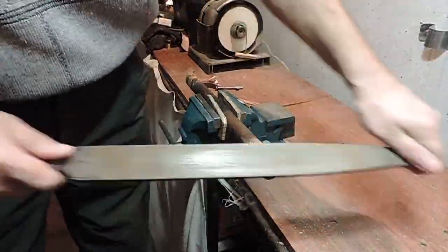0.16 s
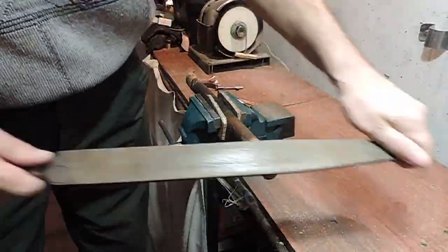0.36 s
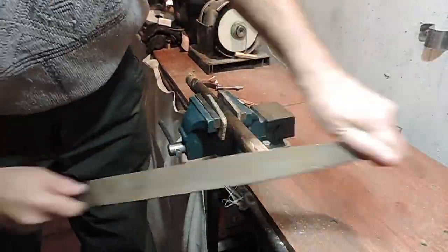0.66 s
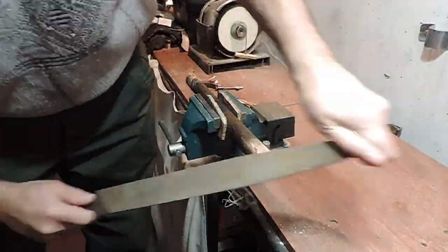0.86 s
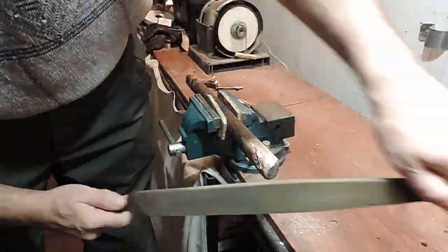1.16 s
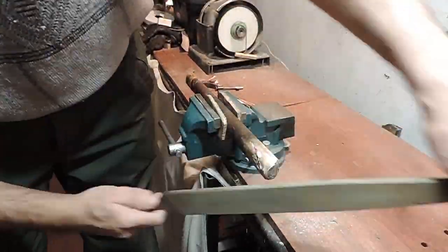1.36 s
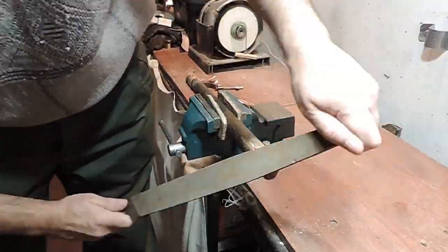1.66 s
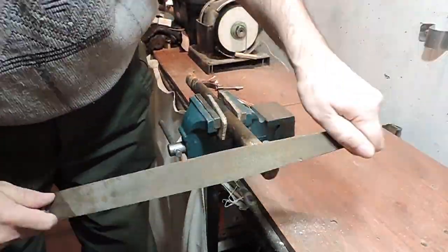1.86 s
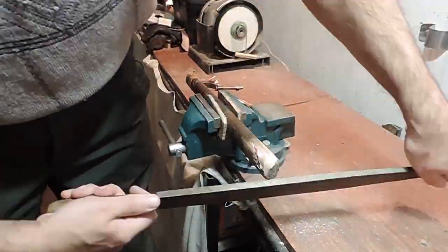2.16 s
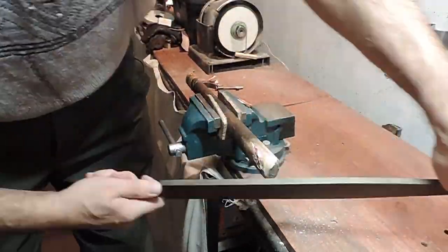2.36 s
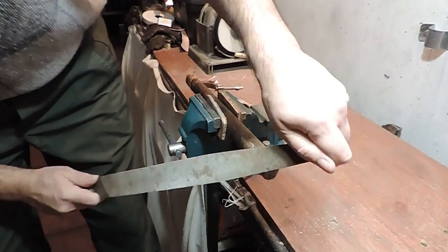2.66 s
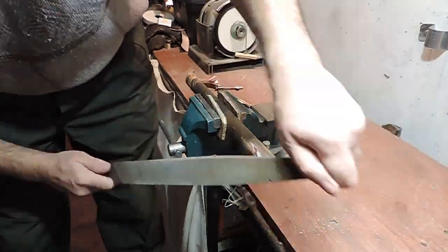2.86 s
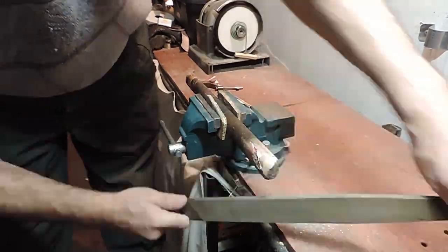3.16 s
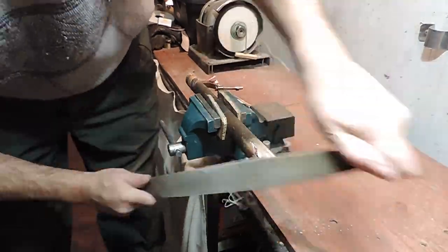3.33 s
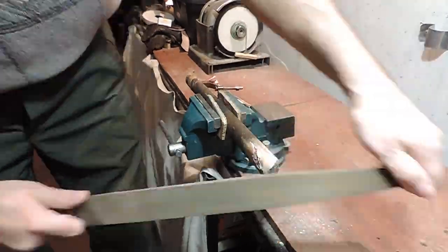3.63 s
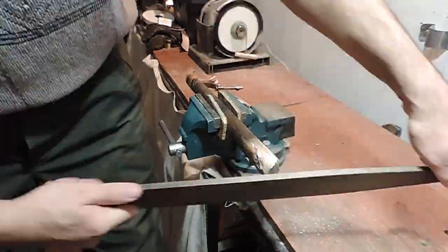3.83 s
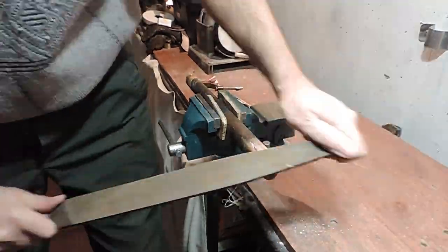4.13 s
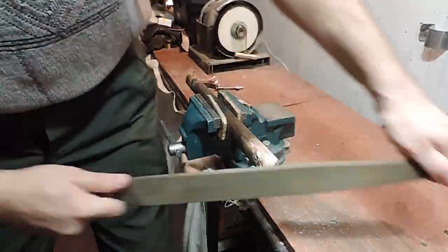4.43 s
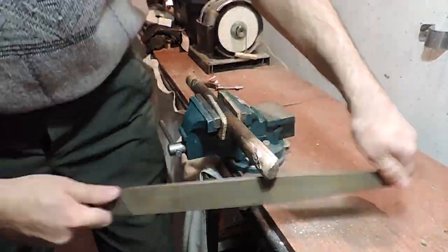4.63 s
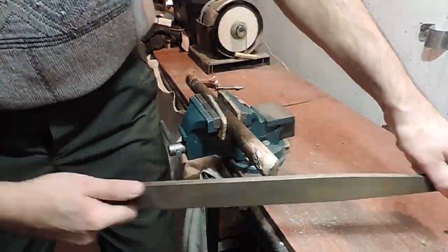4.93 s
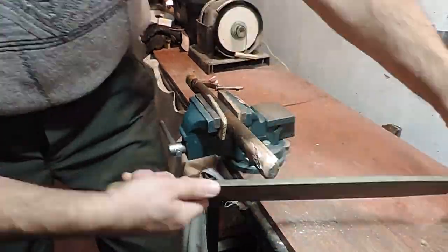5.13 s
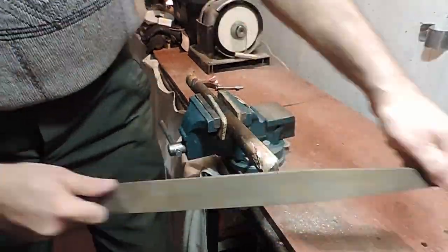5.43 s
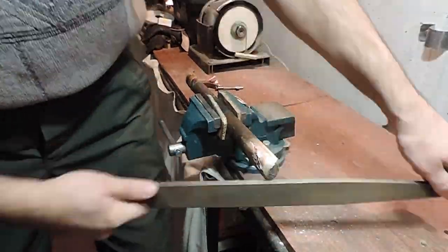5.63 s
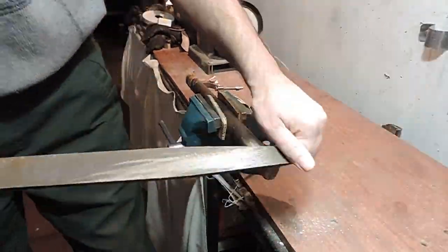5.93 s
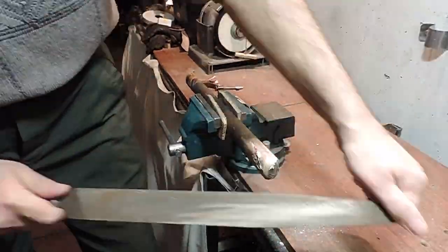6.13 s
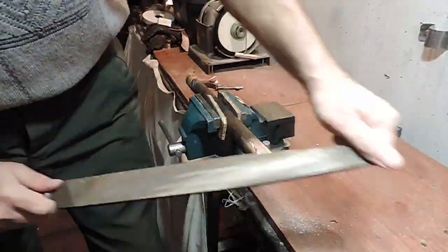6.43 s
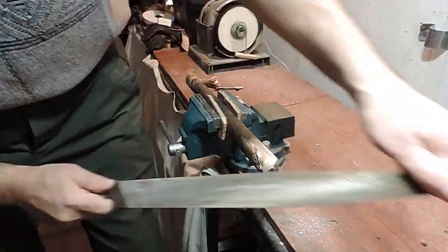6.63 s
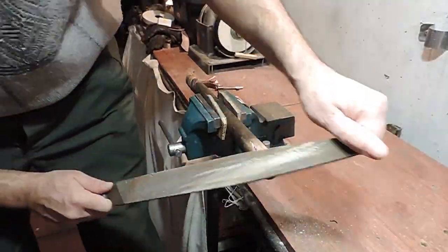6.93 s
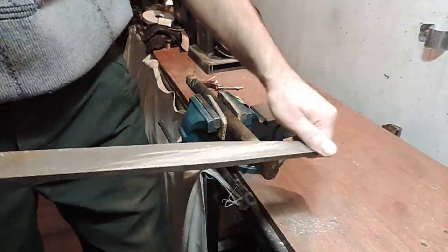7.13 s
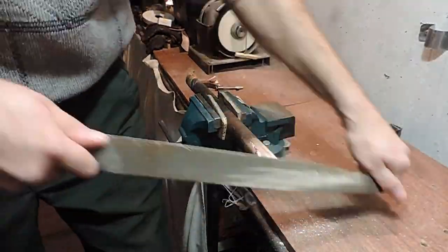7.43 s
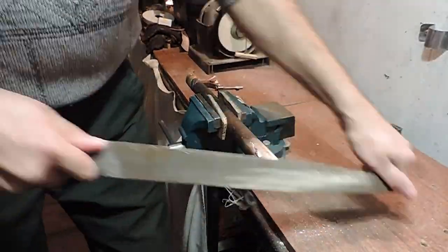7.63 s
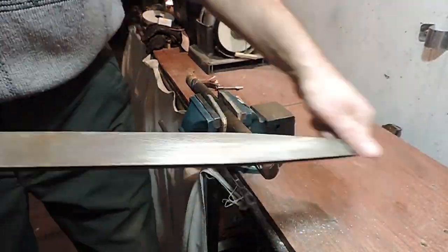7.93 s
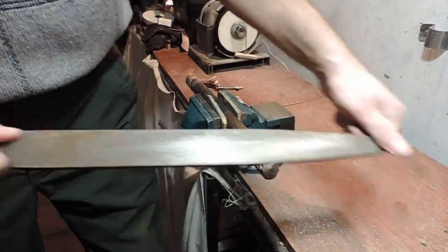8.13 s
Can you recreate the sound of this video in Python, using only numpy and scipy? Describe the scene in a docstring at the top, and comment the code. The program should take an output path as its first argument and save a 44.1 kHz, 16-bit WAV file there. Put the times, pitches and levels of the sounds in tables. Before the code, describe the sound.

A big steel file works a wooden handle clamped in a vise, nearly five strokes a second. Each stroke starts with a brief chatter and rises into a rasping whine. After a few seconds the file sometimes knocks the wood, drawing a low boom from the bench, and twice the steel rings briefly. The sound is close, with short wall echoes and a faint workshop hum.

```python
"""Over the faint hum of a small workshop, a big steel file sweeps a wooden handle held in a vise,
nearly five strokes a second. In each stroke the teeth land and chatter, speed up into a rasping
whine, then brake and lift off; the walls answer briefly. From about three seconds in, the file now
and then bumps the wood and the bench booms. Twice the steel slips off the wood and rings."""
import sys
import numpy as np
from scipy import signal
from scipy.fft import rfft, irfft, next_fast_len
from scipy.io import wavfile
from scipy.ndimage import map_coordinates

SR = 44100
rng = np.random.default_rng(int(sys.argv[2]) if len(sys.argv) > 2 else 0)


def wav_out(sig):
    """Save sig, one row per channel (or a flat mono array), as 16-bit PCM at SR to the path in sys.argv[1]."""
    wavfile.write(sys.argv[1], SR, np.round(np.clip(np.atleast_2d(sig).T, -1, 1) * 32767).astype(np.int16))


N = 365148
T = np.arange(N) / SR

# Colour of the room tone: (frequency [Hz], relative level [dB])
ROOM_COLOUR = [(20, 1), (75, -5), (110, -10), (155, -10), (220, -19), (500, -11.5), (750, -23), (1150, -11),
               (1700, -19), (3000, -19), (7000, -25), (16000, -36)]
# File strokes; pressure 0 is an ordinary hand: (landing time [s], run-up [s], braking [s],
# top tooth rate [Hz], landing level [dB], whine level [dB], run-up pressure [dB], braking pressure [dB])
STROKES = [(.003, 0.053, 0.032, 2715, -35, -35.5, 6.5, 0), (.203, 0.05, 0.031, 2664, -32, -28.5, 5.5, 2),
           (.404, 0.058, 0.025, 3043, -28, -31.5, 5.5, 8), (.597, 0.057, 0.023, 2644, -32, -26, 3, 3.5),
           (.792, 0.078, 0.019, 3584, -36.5, -24.5, 1.5, 2),
           (1.008, 0.058, 0.023, 3467, -28.5, -29, 1.5, 8.5),
           (1.208, 0.052, 0.021, 3098, -30, -29, -2, 2.5),
           (1.415, 0.052, 0.026, 3282, -26.5, -30.5, -0.5, 3.5),
           (1.624, 0.056, 0.024, 2815, -28.5, -30.5, 0.5, 1.5),
           (1.845, 0.053, .017, 2740, -28, -30.5, -15, 7),
           (2.057, 0.055, 0.022, 2434, -28.5, -23.5, 3, 5.5),
           (2.267, .039, 0.04, 2582, -27, -27, -0.5, 6.5), (2.46, 0.055, 0.023, 2452, -33.5, -25, 4, -5.5),
           (2.665, 0.059, 0.026, 2796, -37, -27, -2, -2), (2.875, 0.055, 0.022, 3026, -29, -30, -4, 2.5),
           (3.081, 0.051, .02, 2971, -26.5, -28.5, -6, 4.5),
           (3.26, 0.08, 0.02, 2274, -31.5, -37.5, -1.5, -7), (3.489, .049, 0.017, 3483, -30, -28.5, -1, 4),
           (3.686, 0.058, 0.018, 2673, -31, -21.5, -7, 0.5), (3.894, 0.072, .02, 2706, -32.5, -24, 7, 5.5),
           (4.096, 0.063, 0.022, 3123, -40, -24, -3, -6.5), (4.286, 0.065, .032, 2688, -39, -28.5, -2, -2),
           (4.493, 0.057, .028, 3000, -34.5, -26.5, 2.5, -4.5),
           (4.69, 0.06, .023, 2659, -29, -26.5, -1.5, -3), (4.988, 0.084, 0.021, 2942, -38, -24, 6.5, -17),
           (5.213, 0.077, .033, 3254, -34, -31, 2.5, 3.5), (5.462, 0.072, 0.025, 2745, -26, -27, -0.5, -5),
           (5.684, .082, 0.031, 2420, -37, -27.5, 6, -7), (6.113, 0.1, 0.016, 2583, -30, -24, 5.5, -9),
           (6.428, 0.079, 0.017, 2727, -25, -24.5, 2.5, -8),
           (6.667, 0.068, 0.018, 2552, -30.5, -20, 4.5, -2),
           (6.869, 0.075, 0.013, 2704, -38.5, -23, 1, -13),
           (7.109, 0.043, .015, 2818, -28.5, -27, -7.5, -4.5),
           (7.332, 0.07, 0.024, 2582, -31, -26.5, 6.5, -6.5), (7.542, 0.061, .033, 2053, -35.5, -24, 6, -5),
           (7.749, 0.07, .028, 2047, -35.5, -28.5, 6, -10.5),
           (7.941, .069, 0.024, 2038, -32.5, -28.5, 3, 10), (8.159, 0.066, 0.027, 2052, -33, -28, 5, 12.5)]
# How the file meets the wood: (time [s], flatness [0 tilted to 1 flat])
FLATNESS = [(0, 1), (.22, 0.26), (1.6, 0.14), (2.3, 0), (2.7, .25), (6.7, 0.26), (7.35, 1), (8.2, 0.99)]
# Resonances of handle, vise and file: (frequency [Hz], width [Hz], boost at depth 1 [dB])
RESONANCES = [(155.5, 21, 9), (235, 31, 5.5), (304.6, 41, 6.5), (390.6, 32.3, 6.5), (445.8, 81, 10.5),
              (589, 64, 3.5), (691.4, 37, 4.5), (900, 26, 2), (947, 46, -16), (1263, 162, 8),
              (1482, 91, -4), (1600, 130, -0.5), (1882, 25, 3.5), (2045, 77, 4), (2625, 81, 7.5),
              (2728, 58, 4), (3030, 81, 0), (3195, 230, 4.5), (4045, 81, 6), (5104, 106, 5),
              (6110, 410, 4.5), (10760, 1200, 4)]
# Colours of knocked wood, rasp, whine and bump scratch: (frequency [Hz], relative level [dB])
WOOD_COLOUR = [(40, -38.5), (90, -22), (125, -8.5), (250, -8), (450, -1.5), (800, -2.5), (1300, -3.5),
               (2500, -11), (4000, -14.5), (8000, -34), (16000, -46)]
RASP_COLOUR = [(100, -40.5), (500, -25), (1200, 2.5), (2200, -4), (3200, 1), (4500, 2.5), (6200, -1.5),
               (7800, -9.5), (10500, -5), (12500, -15.5), (14500, -12), (16000, -28.5)]
WHINE_COLOUR = [(500, -13), (1300, 0.5), (2000, 1), (2700, -1), (3400, 4), (5000, 0.5), (16000, 2.5)]
SCRATCH_COLOUR = [(100, -33.5), (600, -14.5), (1300, -4.5), (2000, 0.5), (3500, -6.5), (6000, -10.5),
                  (9000, -16.5), (16000, -37)]
# Balance of the direct sound: (frequency [Hz], left minus right [dB])
BALANCE = [(100, -3.5), (1000, 0), (4000, 0), (9000, -4.5), (15000, -1)]
# Phase spread of the direct sound: (frequency [Hz], lead of the right channel [rad])
RIGHT_LEAD = [(1500, 0), (3500, .3), (5000, .8), (9000, 1), (14000, 1.8)]
# Decay of the wall echoes: (frequency [Hz], t60 [s])
WALL_DECAY = [(120, 0.47), (400, 0.14), (1200, 0.15), (3000, 0.14), (7000, 0.13), (15000, 0.092)]
# Stereo width of echoes and room tone: (frequency [Hz], side minus mid [dB])
ROOM_WIDTH = [(100, -11.5), (600, -32), (1500, -17.5), (3000, -6), (5000, -2), (12000, -0.5)]
# The file bumps the handle: (time [s], contact length [s], knock level [dB], scratch level [dB])
BUMPS = [(2.808, 0.018, -52, -53), (2.995, 0.011, -33, -43.5), (4.366, 0.0072, -56, -26),
         (4.791, .004, -34, -28), (4.7965, .0045, -21.5, -19.5), (5.575, .022, -45.5, -73),
         (5.810, 0.04, -40.5, -43.5), (6.259, 0.015, -38, -41.5), (8.019, 0.0065, -41, -21),
         (8.243, 0.0051, -56, -27)]
# Low modes of the bench: (frequency [Hz], relative level [dB], t60 [s])
BENCH_MODES = [(125.5, -5, 0.3), (154, 3, 0.32), (166.3, -7.5, 0.31)]
# The steel rings as it slips off the wood: (time [s], frequency [Hz], level [dB])
STEEL_RINGS = [(3.345, 4550, -36), (4.372, 3530, -30)]


def amp(db):
    """Decibels to gain."""
    return 10 ** (np.asarray(db) / 20)


def unit(x):
    """x at rms 1."""
    return x / np.sqrt(np.mean(x ** 2) + 1e-20)


def along(points, hz):
    """A (frequency [Hz], value) curve read on a log axis."""
    f, v = np.transpose(points)
    return np.interp(np.log(hz + 1), np.log(f + 1), v)


def wobble(rate):
    """A smooth random modulator, rate knots a second."""
    return unit(map_coordinates(rng.standard_normal(int(N * rate / SR) + 4), [T * rate], order=2))


def filtered(x, response):
    """x through an EQ given as a function of frequency."""
    n = x.shape[-1]
    m = next_fast_len(n + SR // 4)
    return irfft(rfft(x, m) * response(np.fft.rfftfreq(m, 1 / SR)), m)[..., :n]


def body(x, colour, band, depth=1, size=8192):
    """x rings handle, vise and file under a smooth colour, its gain scaled by the power inside band [Hz]
    averaged over the whole spectrum, so a narrower band gets a louder in-band gain."""
    hz = np.fft.rfftfreq(size, 1 / SR)
    peaks_db = sum(db / (1 + (2 * (hz - f) / width) ** 2) for f, width, db in RESONANCES)
    gain = amp(along(colour, hz) + depth * peaks_db)
    gain /= np.sqrt(np.mean(gain ** 2 * ((hz > band[0]) & (hz < band[1]))))
    cepstrum = irfft(np.log(gain + 1e-6))
    cepstrum[1:size // 2] *= 2  # minimum phase: the ring follows the blow
    cepstrum[size // 2 + 1:] = 0
    return signal.oaconvolve(x, irfft(np.exp(rfft(cepstrum))))[:N]


def swell(times, levels_db, rise, fall):
    """Envelope through breakpoints, a row per event; fades in from the first and out after the last."""
    gain = np.zeros(N)
    for corners, db in zip(times, levels_db):
        start, end = corners[0], corners[-1] + fall
        i, j = np.searchsorted(T, [start, end])
        t = T[i:j]
        fades = np.clip((t - start) / rise, 0, 1) * np.clip((end - t) / fall, 0, 1)
        gain[i:j] += amp(np.interp(t, corners, db)) * fades
    return gain


def snaps(rate, spread_db):
    """Crackle: irregular impulses of uneven size, rms 1."""
    clicks = (rng.random(N) < rate / SR) * rng.choice([-1, 1], N)
    return unit(clicks * amp(spread_db * np.clip(rng.standard_normal(N), -2, 2)))


def room_tone(level_db=-64, hum_db=-77, drift_db=1.0):
    """A faint bed of rumble and hiss with a trace of mains hum."""
    mid, side = filtered(rng.standard_normal((2, N)), lambda hz: amp(along(ROOM_COLOUR, hz)))
    side = filtered(side, lambda hz: amp(along(ROOM_WIDTH, hz)))
    drift = amp(drift_db * wobble(7))
    hum = amp(hum_db) * np.sqrt(2) * np.sin(2 * np.pi * 100 * T)
    return amp(level_db) * drift * unit(np.array([mid + side, mid - side])) + hum


def tooth_rate(start_hz=420, push=2.6, braking=.45):
    """Teeth a second: the arm speeds up from the landing, then brakes ever harder."""
    hz = np.full(N, float(start_hz))
    for land, run_up, run_down, top_hz, *_ in STROKES:
        i, j = np.searchsorted(T, [land, land + run_up + run_down + .03])
        up = np.clip((T[i:j] - land) / run_up, 0, 1)
        down = np.clip((T[i:j] - land - run_up) / run_down, 0, 1.08)
        climb_hz = start_hz + (top_hz - start_hz) * np.sin(np.pi / 2 * up) ** push
        hz[i:j] = climb_hz * (1 - braking * down ** 2)
    return hz


def stroke_cues():
    """Times [s] in each stroke: landing, half run-up, nearly top speed, top speed, half braked, lift."""
    land, run_up, run_down = np.transpose(STROKES)[:3]
    top = land + run_up
    return land, land + run_up / 2, top - run_up / 4, top, top + run_down / 2, top + run_down


def chatter():
    """The file touches down, bounces on the wood, then settles as it gains speed."""
    land, half, _, _, _, lift = stroke_cues()
    land_db = np.transpose(STROKES)[4]
    press = swell(np.c_[land, land + .005, land + .013, land + .026, half + .008, lift],
                  land_db[:, None] + [0, 4, -1.5, -4, -16, -15.5], rise=0.0003, fall=0.006)
    catches = 0.69 * snaps(2200, 3.2) + .5 * rng.standard_normal(N)
    return body(press * catches, WOOD_COLOUR, (150, 1500))


def rasp(tooth_phase, grain, tooth_depth=0.38, usual_landing_db=-31):
    """Fibres tear in clumps as each tooth passes; a harder or flatter landing bites deeper."""
    land, half, _, top, easing, lift = stroke_cues()
    land_db, _, push_db, follow_db = np.transpose(STROKES)[4:]
    flatness = np.interp(land, *np.transpose(FLATNESS))
    bite_db = -48.5 + 1.46 * (land_db - usual_landing_db) + 5.5 * flatness
    scrape_db = -39 + 0.95 * push_db
    top_db = -36.5 + 0.13 * follow_db
    cut = swell(np.c_[land, land + .009, land + .017, half, top, easing, lift],
                np.c_[bite_db, bite_db + 1, bite_db - 3, scrape_db - 1.5,
                      top_db, top_db - 2.5, top_db - 10], rise=0.0055, fall=0.0027)
    teeth = unit(1 + tooth_depth * np.cos(tooth_phase))
    fibres = 0.76 * snaps(3500, 2.4) + .5 * rng.standard_normal(N)
    return body(cut * teeth * fibres * grain, RASP_COLOUR, (3700, 14000))


def frayed(phase, roughness):
    """A tone with rough edges: no two teeth bite alike."""
    fluttering = np.sin(phase) * (1 + roughness * wobble(900))
    return unit(fluttering + roughness * wobble(900) * np.cos(phase))


def whine(tooth_phase, skid, grain, roughness=0.93):
    """Evenly spaced teeth sing a gliding note, louder under pressure; a tilted file squeals on top."""
    land, half, near_top, top, easing, lift = stroke_cues()
    _, run_up, run_down, _, _, whine_db, push_db, follow_db = np.transpose(STROKES)
    rise_db, brake_db = -39 + 1.4 * push_db, -34.5 + follow_db
    sing = swell(np.c_[land + .01, half, near_top, top - run_up / 12,
                       top + run_down / 4, easing + run_down / 8, lift],
                 np.c_[rise_db - 12, rise_db - 3, (rise_db + whine_db) / 2 - 8.5, whine_db - 1,
                       whine_db - 1, brake_db, brake_db - 6], rise=.004, fall=0.0074)
    note = frayed(0.99 * tooth_phase, roughness * skid)
    flicker = unit(amp(1.92 * wobble(280)))
    overtones = (frayed(2 * tooth_phase, 0.17) + 0.41 * frayed(3 * tooth_phase, 0.77)
                 + 0.24 * frayed(4 * tooth_phase, 1.0))
    squeal_db = -35.3 - 18 * np.interp(land, *np.transpose(FLATNESS))
    squeal = swell(np.c_[half, near_top, top, easing, lift],
                   squeal_db[:, None] + [-10.5, -2, 3.5, -4, -5.5], rise=.004, fall=0.00597)
    tone = sing * note * flicker + squeal * overtones * grain
    return body(tone, WHINE_COLOUR, (0, SR), depth=1.63)


def filing(jitter=0.1254, grain_db=2.5):
    """Slow teeth catch and chatter; fast ones cut in step, as a rasp and a whine."""
    land, half, near_top, top, _, lift = stroke_cues()
    # the file skids unevenly until the teeth find their groove near top speed
    skid = swell(np.c_[land, half, near_top, top, lift],
                 np.tile([0, 0, -4, -10, -2], (len(land), 1)), rise=0.0013, fall=0.00987)
    tooth_hz = tooth_rate() * (1 + jitter * skid * wobble(450))
    tooth_phase = 2 * np.pi * np.cumsum(tooth_hz) / SR
    landings = amp(0.03) * chatter()
    grain = unit(amp(grain_db * wobble(230)))  # hard and soft wood under the file
    return landings + amp(-1.13) * rasp(tooth_phase, grain) + amp(0.1) * whine(tooth_phase, skid, grain)


def wall_echoes(x, wet_db=-9.0, scatter_db=-4.5, onset_s=0.0017, scatter_t60=0.035, patterns=9):
    """Wall echoes and scatter off the vise; the pattern shifts with each stroke as the arms move."""
    tails = []
    for _ in range(patterns):
        # three noise tails: wall mid, wall side, vise scatter
        hz, t, spectra = signal.stft(rng.standard_normal((3, SR // 3)), SR, nperseg=128)
        build_up = 1 - np.exp(-(t / onset_s) ** 2)
        spectra[:2] *= amp(-60 * t / along(WALL_DECAY, hz)[:, None]) * build_up
        spectra[2] *= amp(-60 * t / scatter_t60)
        spectra /= np.linalg.norm(signal.istft(spectra, SR, nperseg=128)[1], axis=1)[:, None, None]
        spectra[1:] *= amp(along(ROOM_WIDTH, hz))[:, None]  # widest in the treble
        mid, side, scatter = signal.istft(spectra, SR, nperseg=128)[1]
        spread = amp(wet_db) * side + amp(scatter_db) * scatter
        tails.append(amp(wet_db) * mid + np.outer([1, -1], spread))
    starts = np.round(np.transpose(STROKES)[0] * SR).astype(int)
    echo = np.zeros((2, N + SR))
    for k, (i, j) in enumerate(zip(starts, np.r_[starts[1:], N])):
        answer = signal.fftconvolve(x[None, i:j], tails[k % patterns], axes=1)
        echo[:, i:i + answer.shape[1]] += answer
    return echo[:, :N]


def bumps(fade_s=0.0081):
    """The file scuffs the handle: a woody knock under a scratch of teeth."""
    start, length, knock_db, scratch_db = np.transpose(BUMPS)
    corners = np.c_[start, start + length, start + length + fade_s]
    shape_db = [2.5, 0, -14]
    knock = swell(corners, knock_db[:, None] + shape_db, rise=0.0029, fall=.01) * snaps(7000, 1.1)
    scratch = swell(corners, scratch_db[:, None] + shape_db, rise=0.0021, fall=0.0044) * snaps(9000, 2.9)
    return body(knock, WOOD_COLOUR, (200, 900)) + body(scratch, SCRATCH_COLOUR, (1000, 8000))


def bench_boom(swing_per_s=32, attack_s=0.011):
    """The bench takes up each bump's whole push: a harder or longer contact booms louder."""
    start, length, knock_db, _ = np.transpose(BUMPS)
    blows, t = np.zeros(N), T[:SR // 2]
    blows[np.round(start * SR).astype(int)] = swing_per_s * length * amp(knock_db)
    modes = sum(amp(db - 60 * t / t60) * np.sin(2 * np.pi * hz * t) for hz, db, t60 in BENCH_MODES)
    return signal.oaconvolve(blows, modes * (1 - np.exp(-t / attack_s)))[:N]


def steel_ring(t60=0.099, attack_s=0.0027):
    """The freed file rings briefly until the hands damp it."""
    out, t = np.zeros(N), T[:SR // 4]
    for start, hz, db in STEEL_RINGS:
        envelope = amp(db - 60 * t / t60) * (1 - np.exp(-t / attack_s))
        out[round(start * SR):][:len(t)] += envelope * np.sin(2 * np.pi * hz * t)
    return out


def scene():
    """The work leans a little right, its treble spread in phase, over wall echoes and room tone."""
    work = filing() + bumps() + bench_boom() + steel_ring()
    sides = np.array([[.5], [-.5]])  # left, right
    placement = lambda hz: amp(sides * along(BALANCE, hz)) * np.exp(-1j * sides * along(RIGHT_LEAD, hz))
    return filtered(work, placement) + wall_echoes(work) + room_tone()


def record(dry, top_hz=15900):
    """A brick-wall high cut on the whole mix."""
    return filtered(dry, lambda hz: hz < top_hz)


dry = scene()
out = record(dry)
wav_out(out)
```